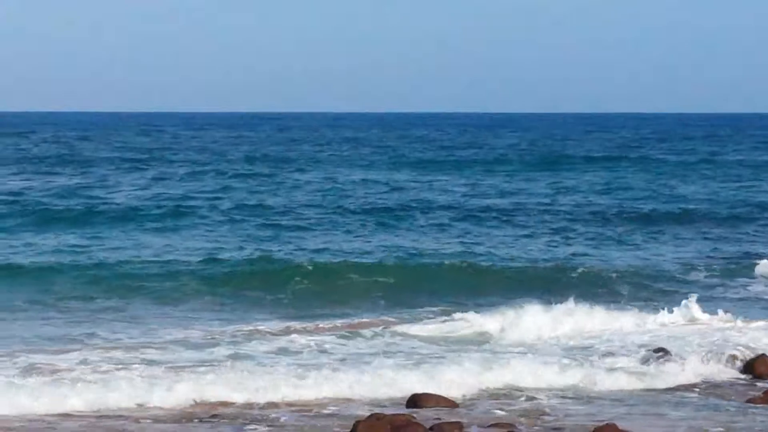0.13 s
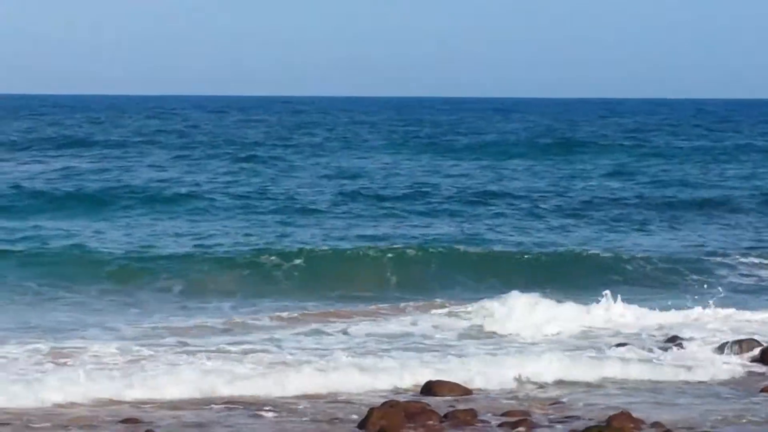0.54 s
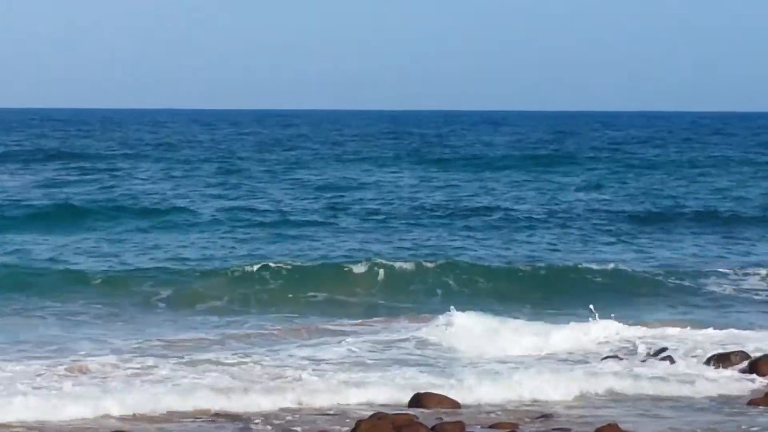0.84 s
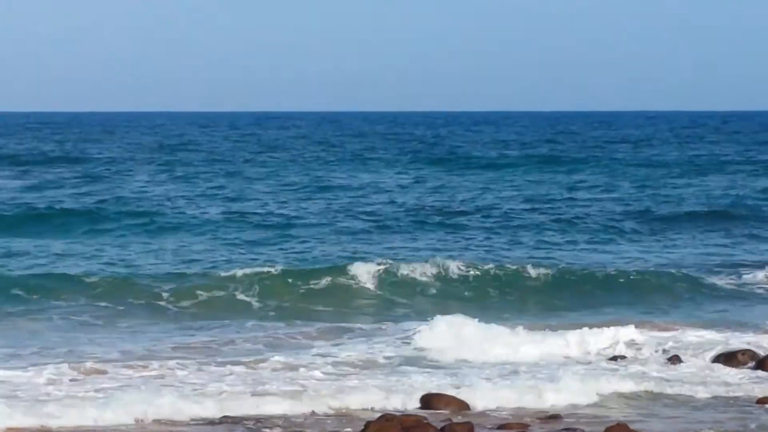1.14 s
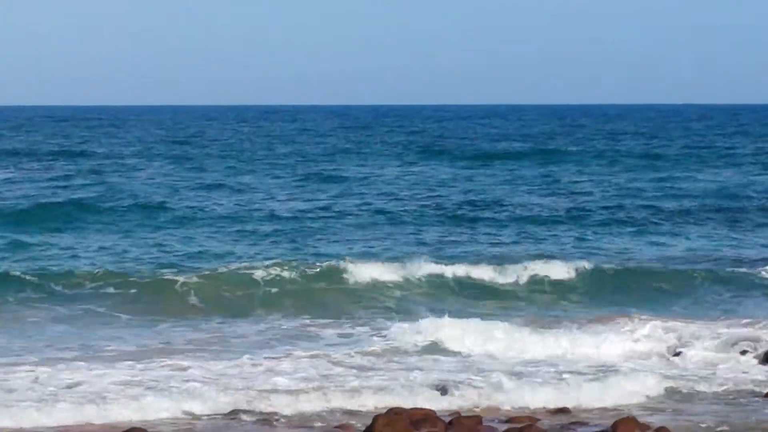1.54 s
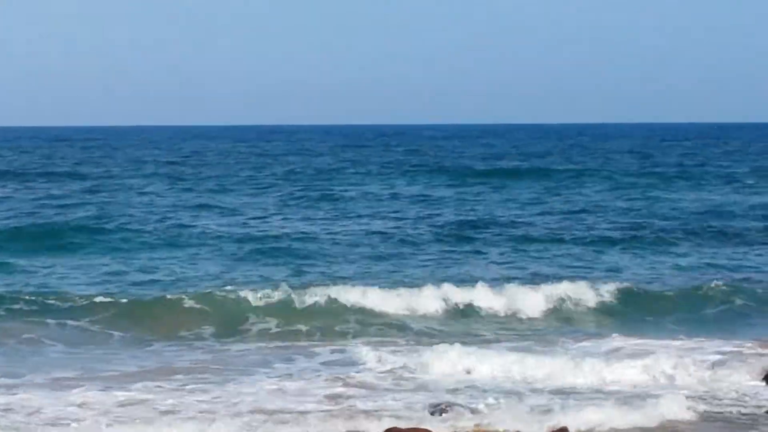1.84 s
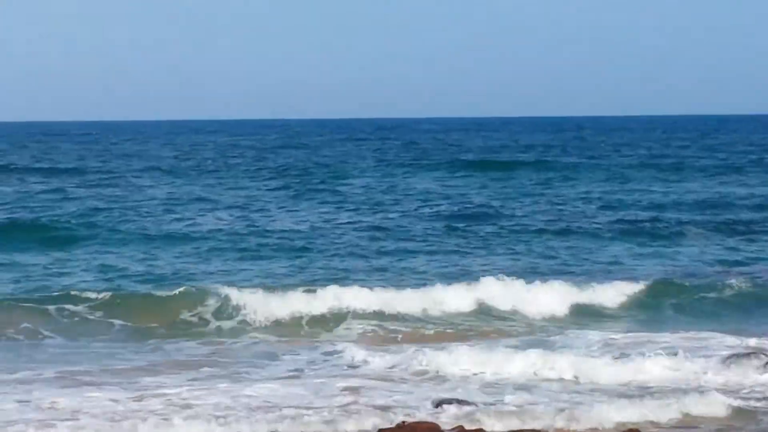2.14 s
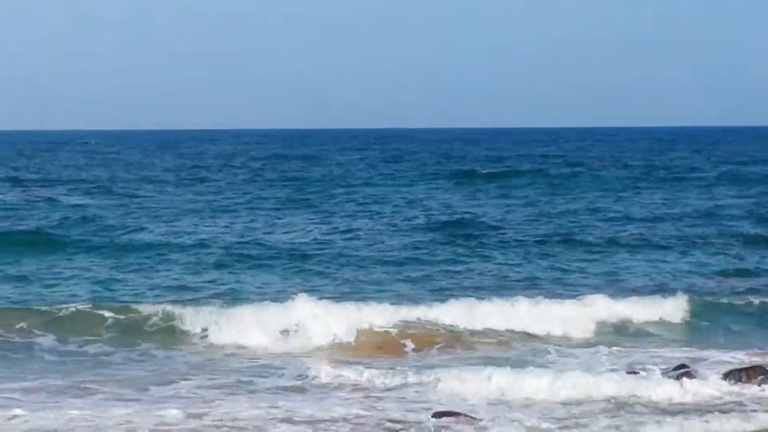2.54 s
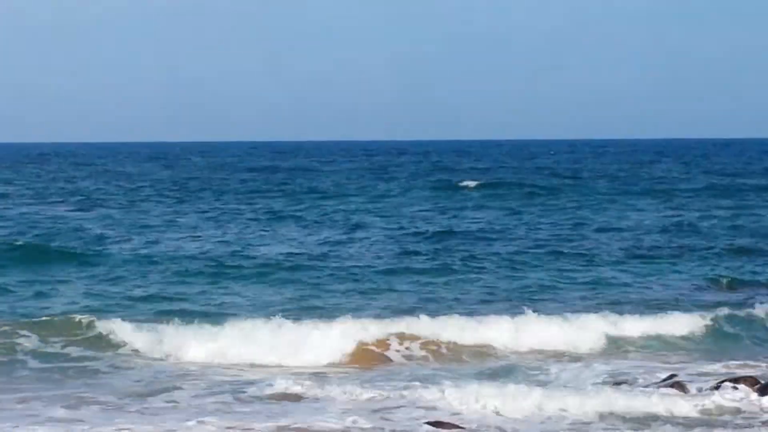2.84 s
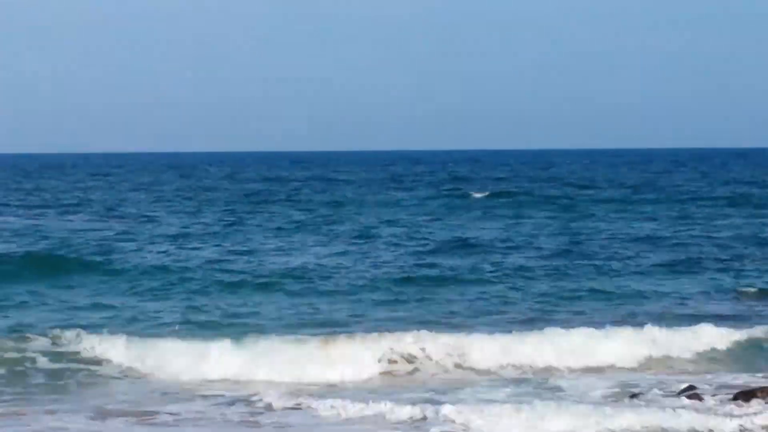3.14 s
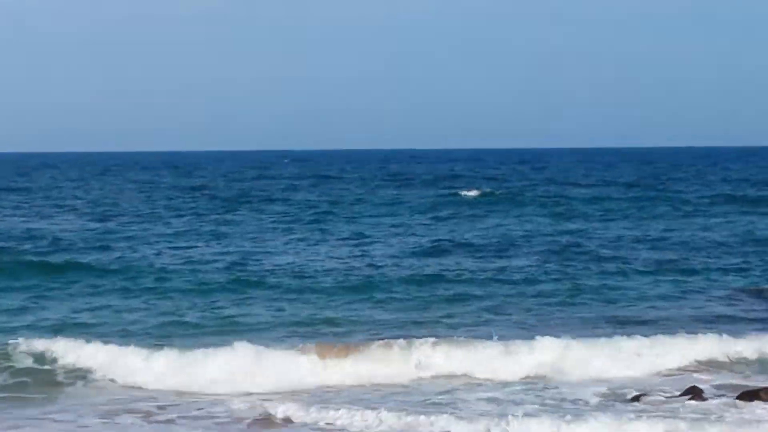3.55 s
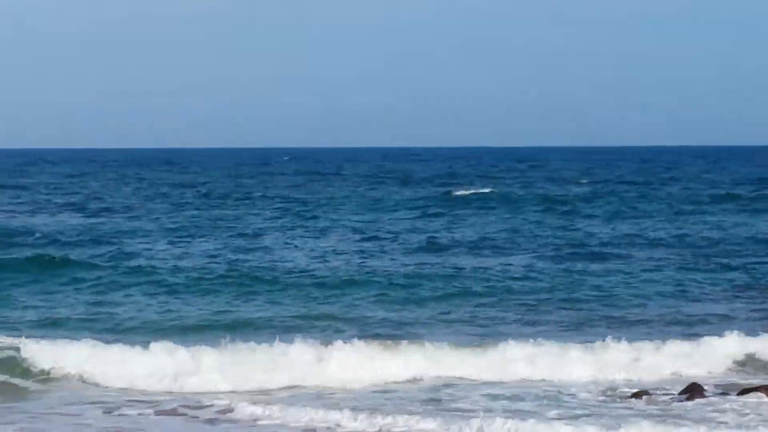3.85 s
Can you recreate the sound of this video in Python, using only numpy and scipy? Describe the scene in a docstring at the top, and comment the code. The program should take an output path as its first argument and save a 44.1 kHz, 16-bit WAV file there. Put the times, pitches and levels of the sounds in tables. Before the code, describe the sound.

Steady ocean surf fades in after a brief silence on a rocky shore. Broken water roars while another crest tips over into hissing, crackling foam. Light wind buffets the microphone, with one short bump on each side.

```python
"""A stony shore, heard from the beach: broken water rumbles and roars without a pause while the next crest
spills over and its foam fizzes, with single bubbles and drops ticking close by. Two unlike microphone
ports, the left dull and the right bright, pick it up; a breeze flutters on both and thumps each once.
The sound fades in after a short silence."""
import sys
import numpy as np
from scipy import signal
from scipy.fft import rfft, irfft
from scipy.io import wavfile

SR = 44100
rng = np.random.default_rng(int(sys.argv[2]) if len(sys.argv) > 2 else 0)


def log_audio(samples):
    """Write samples as a 16-bit WAV file to the path given in sys.argv[1]."""
    # one column per channel
    frames = np.atleast_2d(samples).T
    # limit to full scale, then quantise
    limited = np.clip(frames, -1, 1)
    pcm = np.round(limited * 32767).astype(np.int16)
    wavfile.write(sys.argv[1], SR, pcm)


N = 176400

# deep rumble of the surf (time [s], level [dB])
RUMBLE_LEVEL = [(0.56, 1.0), (0.78, 1.8), (1.36, -0.1), (1.46, 2), (1.64, -3.5), (1.94, 1.0), (2.08, -2),
                (2.38, 0), (2.62, -4), (3.1, -0.2), (3.38, 1.0), (3.96, -1)]
# roar of broken water (time [s], level [dB])
ROAR_LEVEL = [(0.56, 0.87), (1.08, 0.48), (1.18, 0.89), (1.44, 0.26), (1.52, 1.5), (1.6, -0.79),
              (1.72, 1.1), (2.24, -0.66), (2.46, 1.3), (2.74, 0.97), (2.92, -1.3), (3.12, -0.54),
              (3.28, -1.1), (3.44, -0.58), (3.7, -1.8), (3.96, -0.5)]
# rush of the spilling crest (time [s], level [dB])
CREST_LEVEL = [(0.56, -2.5), (0.88, -2.5), (1.2, -1.3), (1.34, -2), (1.48, -1.5), (1.56, -0.7),
               (1.86, -2.2), (2.26, 0.1), (2.78, -0.2), (3.02, 0.9), (3.56, 1.5), (3.96, 0.7)]
# fizz of the foam (time [s], level [dB])
FOAM_LEVEL = [(0.56, -2.3), (0.72, -2.5), (0.84, -1.3), (1.04, -0.7), (1.46, -1.0), (2.22, 0.7),
              (2.42, 0.1), (3.08, -0.35), (3.42, 0), (3.64, -0.6), (3.78, 0.6), (3.96, -0.2)]
# colour of the surf at the dull left port (frequency [Hz], level [dB per Hz])
LEFT_COLOUR = [(20.0, -84), (73.0, -60.5), (112.0, -52), (273.0, -58), (431.0, -52.5), (664.0, -59.5),
               (1190.0, -57), (2030.0, -59), (3370.0, -68.5), (4560.0, -67), (5180.0, -61.5), (5880.0, -63),
               (7210.0, -76), (8830.0, -76.5), (9530.0, -85), (11400.0, -113.3), (11700.0, -120.5)]
# colour of the surf at the bright right port (frequency [Hz], level [dB per Hz])
RIGHT_COLOUR = [(20.0, -77), (76.8, -54.5), (115.0, -53.0), (160.0, -53.5), (273.0, -57.5), (410.0, -55),
                (615.0, -59.5), (753.0, -57), (923.0, -57), (1100.0, -61.5), (1570.0, -60.5),
                (2130.0, -65.5), (2480.0, -64.7), (3280.0, -67.5), (7210.0, -60), (10300.0, -67.5),
                (13300.0, -67), (14300.0, -72)]
# how the two ports hear the same water (frequency [Hz], likeness [0-1], lead of the right port [rad])
PORT_LIKENESS = [(30, 0.25, -0.5), (110, 0.94, 0.02), (250, 0.96, 0.4), (483, 0.94, 0.43), (670, .6, 1.64),
                 (880, 0.65, 0.68), (1000, 0.7, 1.03), (1100, 0.36, 1.5), (1375, 0.76, 3.5),
                 (1750, 0.45, 2.5), (1970, 0.57, 4), (2230, 0.25, 6), (2820, 0.24, 7.5), (3090, 0.14, 11),
                 (3730, 0.33, 14.5), (4010, .3, 16), (4640, 0.05, 17), (4930, 0.24, 16.5),
                 (5360, 0.26, 19.5), (5840, 0.42, 21.5), (6580, 0.07, 25), (8000, 0.22, 26)]
# wind thumps on the microphone (time [s], envelope peak [dB], port [0 left, 1 right])
WIND_THUMPS = [(0.717, -12.5, 1), (1.787, -13, 0)]

RUMBLE_TOP_HZ, ROAR_TOP_HZ, CREST_TOP_HZ = 253, 1200, 3200  # where one part gives way to the next
CHURN_PER_S, FOAM_CHURN_DB = 19, 0.27
TIME_S = np.arange(N) / SR
BIN_HZ = np.maximum(np.arange(N // 2 + 1) * SR / N, 1)


def surf():
    """All the breaking water as heard from the beach, coloured by each microphone port."""
    deep, low, middle = lowpass(RUMBLE_TOP_HZ), lowpass(ROAR_TOP_HZ), lowpass(CREST_TOP_HZ)
    rumble = water(deep, RUMBLE_LEVEL, churn_db=0.5)
    roar = water(low * (1 - deep), ROAR_LEVEL, churn_db=0.64)
    crest = water(middle * (1 - low), CREST_LEVEL, churn_db=0.3)
    foam = water(1 - middle, FOAM_LEVEL, FOAM_CHURN_DB)
    sea = rumble + roar + crest + foam + spray() + pops()
    colour = gain([over_frequency(LEFT_COLOUR), over_frequency(RIGHT_COLOUR)])
    return irfft(rfft(sea) * colour, N) * np.sqrt(SR / 2)


def water(band_power, levels, churn_db):
    """Countless merged bubbles in one range of sizes, churning in level, spread along the shore."""
    likeness = np.clip(over_frequency(PORT_LIKENESS), 0, 1)
    lead = over_frequency(PORT_LIKENESS, column=2)
    left, unrelated = noise_spectra()
    right = (likeness * left + np.sqrt(1 - likeness ** 2) * unrelated) * np.exp(1j * lead)
    bubbles = irfft(np.array([left, right]) * np.sqrt(band_power), N)
    return bubbles * envelope(levels) * gain(churn_db * drift(CHURN_PER_S))


def spray(peak_s=2.11, width_s=0.5, centre_hz=5200, width_octaves=0.16, level_db=-2):
    """A narrow hiss of spray that swells and sinks as the next wave tips over."""
    band = np.exp(-(np.log2(BIN_HZ / centre_hz) / width_octaves) ** 2)
    swell = np.exp(-((TIME_S - peak_s) / width_s) ** 2)
    return water(band, FOAM_LEVEL, FOAM_CHURN_DB) * swell * gain(level_db)


def pops(per_s=3000, spread_db=5, range_db=19.5, level_db=-11):
    """Bubbles burst and drops fall close by: many tiny ticks and a few larger, following the foam."""
    size = gain(np.minimum(spread_db * rng.exponential(size=(2, N)), range_db))
    bursts = rng.random((2, N)) < per_s / SR
    ticks = bursts * size * np.sign(rng.standard_normal((2, N)))
    above_roar = np.sqrt(1 - lowpass(ROAR_TOP_HZ))
    crackle = irfft(rfft(ticks / ticks.std()) * above_roar, N)
    return crackle * gain(level_db) * envelope(FOAM_LEVEL)


def breeze(top_hz=70.5, level_db=-46.5, gusts_per_s=4, gust_db=0.5):
    """A low flutter of air right on the microphone, separate on each port."""
    band_power = lowpass(top_hz) * (1 - lowpass(top_hz / 2, order=4))
    air = irfft(noise_spectra() * np.sqrt(band_power), N)
    gusts = np.array([drift(gusts_per_s), drift(gusts_per_s)])
    return air / air.std() * gain(level_db + gust_db * gusts)


def thumps(hz=125, width_s=0.0039):
    """An eddy strikes one port: a short push and pull of pressure."""
    ports = np.zeros((2, N))
    for at_s, level_db, port in WIND_THUMPS:
        t = TIME_S - at_s
        pulse = -np.sin(2 * np.pi * hz * t) * np.exp(-(t / width_s) ** 2)
        ports[port] += gain(level_db) * pulse
    return ports


def gain(db):
    """Decibels to gain."""
    return 10 ** (np.asarray(db) / 20)


def envelope(levels):
    """A (time [s], level [dB]) table as a gain for every sample."""
    return gain(np.interp(TIME_S, *np.array(levels).T))


def over_frequency(rows, column=1):
    """One column of a table for every bin, joined over log frequency."""
    rows = np.array(rows)
    return np.interp(np.log(BIN_HZ), np.log(rows[:, 0]), rows[:, column])


def lowpass(hz, order=8):
    """Share of the power in each bin that a steep low-pass lets through."""
    return 1 / (1 + (BIN_HZ / hz) ** order)


def noise_spectra():
    """Spectra of two unrelated white noises."""
    return rfft(rng.standard_normal((2, N)))


def drift(per_s):
    """Smooth random drift with a spread of 1."""
    slow = irfft(noise_spectra()[0] * np.sqrt(lowpass(per_s / 2, order=4)), N)
    return slow / slow.std()


def scene():
    """The surf from the beach, with wind on the microphone."""
    return surf() + breeze() + thumps()


def record(dry):
    """The sound fades in after a short silence, and the highest treble is cut."""
    silence_s, fade_s, top_hz = 0.4235, 0.098, 14600
    fade = np.clip((TIME_S - silence_s) / fade_s, 0, 1) ** 0.7
    treble_cut = signal.ellip(12, 0.1, 90, top_hz, fs=SR, output="sos")
    return signal.sosfilt(treble_cut, dry * fade)


dry = scene()
out = record(dry)
log_audio(out)
```